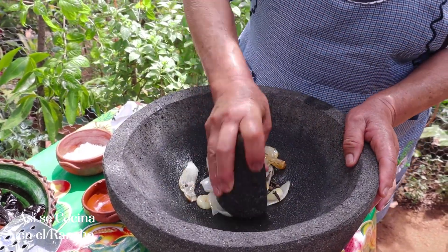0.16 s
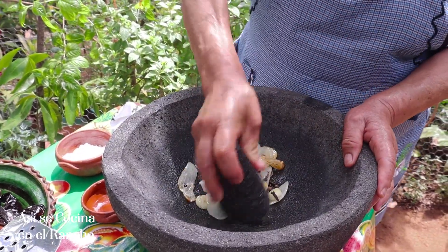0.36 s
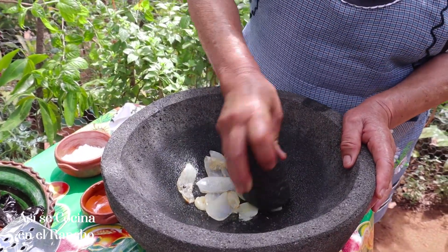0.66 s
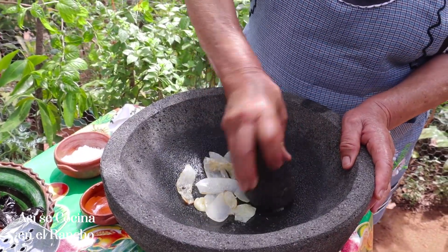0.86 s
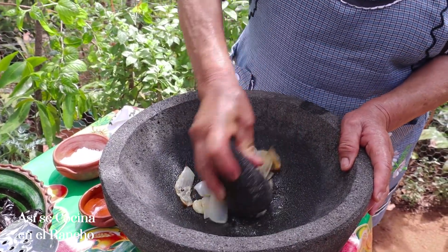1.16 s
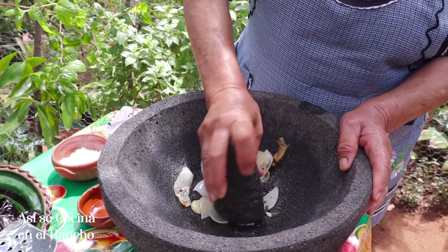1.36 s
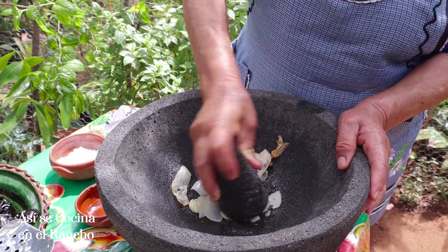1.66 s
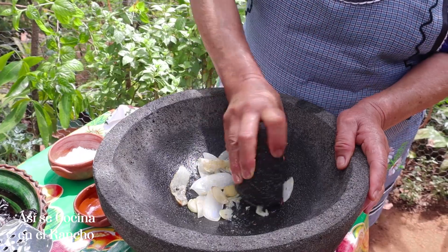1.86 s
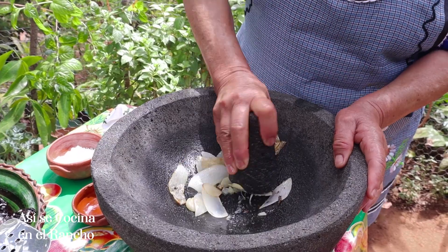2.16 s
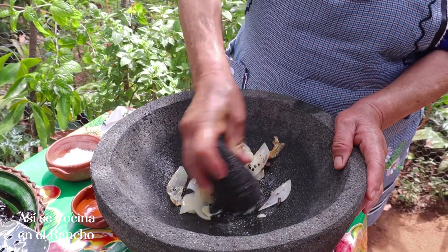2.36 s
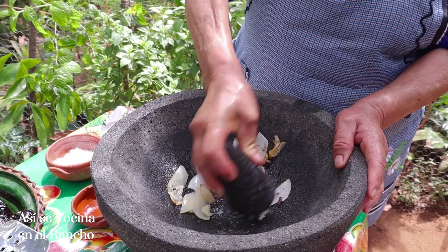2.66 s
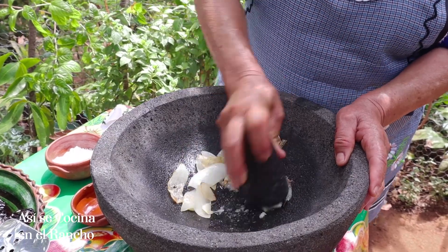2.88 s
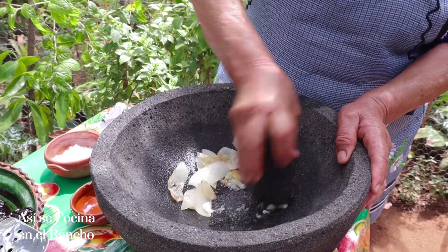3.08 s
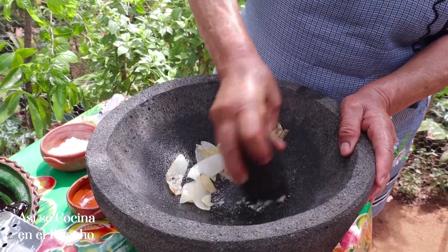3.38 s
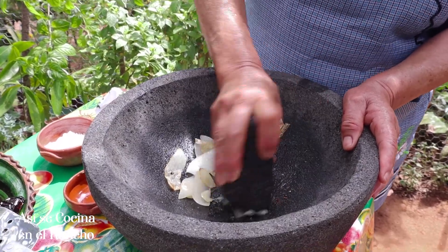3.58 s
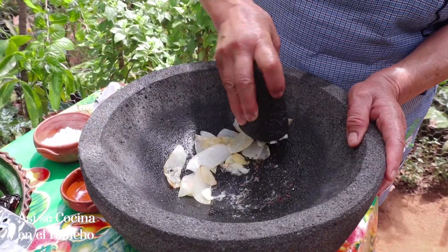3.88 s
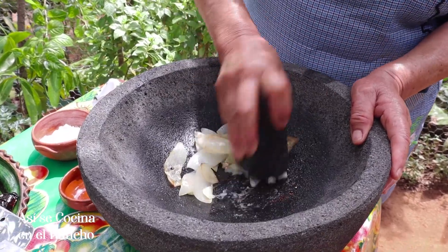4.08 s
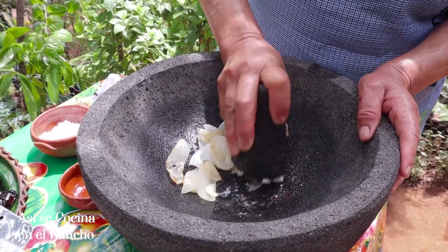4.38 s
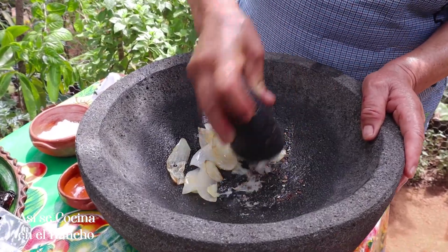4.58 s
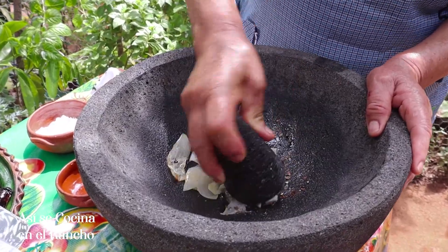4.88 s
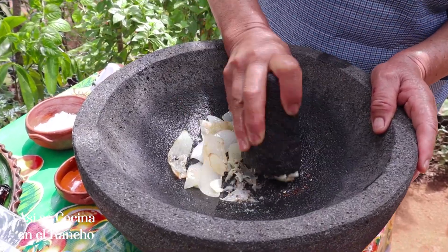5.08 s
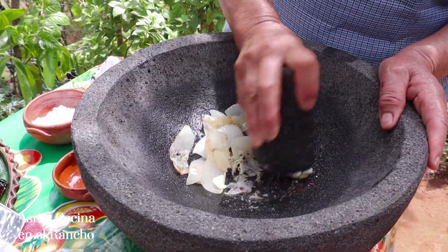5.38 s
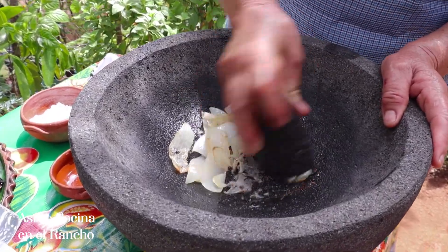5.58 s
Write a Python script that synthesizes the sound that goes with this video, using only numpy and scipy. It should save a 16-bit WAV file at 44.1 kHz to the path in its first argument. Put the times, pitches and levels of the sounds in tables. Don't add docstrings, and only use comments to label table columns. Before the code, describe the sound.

Close, dry outdoor sound of a stone pestle working in a rough stone bowl. Two hard clacks come in the first half second, then short gritty presses with crisp vegetable snaps and dull table thumps. After about three seconds the strokes become longer, grainier grinding sweeps, with a heavy low thud near the end. A very quiet garden and faint far bird whistles lie behind.

```python
import sys
import numpy as np
from scipy import signal
from scipy.fft import rfft, irfft, next_fast_len
from scipy.io import wavfile
from scipy.ndimage import uniform_filter1d

SR = 44100
rng = np.random.default_rng(int(sys.argv[2]) if len(sys.argv) > 2 else 0)


def how_loud(loudness_db):
    steps = np.asarray(loudness_db, float) / 20
    return 10 ** steps


def materialize(psi):
    bounded = np.clip(np.atleast_2d(psi).T, -1, 1)
    quanta = np.round(bounded * 32767).astype(np.int16)
    wavfile.write(sys.argv[1], SR, quanta)


N = 252913

# frequency_hz, density_db
AIR_SPECTRUM = [(12, -38), (20, 1.5), (53, -13), (93, -13), (472, -18.5), (660, -12), (780, -22),
                (849, -13), (1290, -24), (1860, -21), (2600, -25), (16000, -40)]
AIR_DB = -50.5
# start_s, length_s, pitch_hz, level_db
WHISTLES = [(.42, 0.55, 800, -80), (0.559, 0.075, 1960, -56), (0.62, 0.088, 2520, -58),
            (1.558, 0.082, 1960, -55), (2.068, 0.16, 2460, -55), (2.266, 0.074, 2410, -55),
            (2.622, 0.3, 785, -55), (2.623, 0.21, 2070, -63), (4.548, 0.21, 780, -59),
            (0.097, .2, 2050, -62), (2.727, .1, 1990, -64), (3.795, 0.13, 790, -69)]

# centre_hz, width_hz, level_db
TABLE_MODES = [(91.3, 48, -5), (168, 29, -2.5), (241.4, 33, -5), (279.6, 49, 0.5), (384.4, 444, 0)]
# start_s, peak_db, pitch_hz
THUMPS = [(0.065, -11.5, 290), (0.203, -16, 285), (0.363, -5, 338), (1.055, -15.5, 174), (1.121, -6, 277),
          (1.318, -14.5, 238), (1.651, -34, 278), (1.812, -25, 240), (1.887, -24, 132), (1.989, -15.5, 193),
          (2.186, -33, 272), (2.253, -7.5, 255), (2.336, -8, 216), (2.451, -15, 280), (2.51, -12.5, 183),
          (2.57, -11, 158), (2.839, -12, 142), (2.968, -13.5, 178), (3.335, -11.5, 226), (3.643, -18, 304),
          (3.688, -18.5, 200), (3.991, -24.5, 99), (4.114, -10, 138), (4.185, -14, 157), (4.762, 1.5, 193),
          (4.778, -23, 330), (4.805, -27, 286), (4.867, -10, 249), (5.059, -20.5, 280), (5.369, -18, 142),
          (5.425, -14, 250), (5.44, -18, 200), (1.244, -25.5, 200), (2.675, -16.5, 270),
          (4.301, -19.5, 218), (5.536, -15, 246)]

# pitch_hz, t60_s
BOWL_MODES = [(285, .04), (490, .06), (625, .025), (765, .05), (860, .032), (1090, .02), (1185, .055),
              (1525, .024), (1790, .022), (2175, .028), (2410, .024), (3022, .035), (3445, .018),
              (3630, .022)]
STRUCK_SPOTS = [
    (-30, -13, -17, -14, -4, 2, -8, -9, -13, -19, -31, -33, -24, -22),
    (-30, -15, -19, -21, -8, 0, -5, -3, -6, -10, -9, -11, -7, -8),
    (-34, -33, -36, -26, -12, -15, -33, -21, -26, -48, -46, -46, -44, -44),
    (-30, -22, -19, -17, -18, -19, -20, -13, -28, -30, -36, -38, -33, -30),
]
# peak_db, ring_factor, contact_ms
CLACKS = [
    (-1.5, 1, .13),
    (1, 1, .08),
    (-14.5, 0.75, 0.24),
    (-11, 0.64, 0.23),
]
CLACK_TIMES = [.0693, .3673, .8385, 3.5511]
# start_s, peak_db, best_excited_hz, loss_db_per_octave
KNOCKS = [(0.051, -23, 520, -5), (.141, -26.5, 605, 1), (0.206, -20, 554, 31), (1.052, -29, 800, 16),
          (1.121, -28, 1050, 24), (1.192, -27.5, 650, 8), (1.322, -29.5, 790, 28), (1.81, -23.5, 504, -1.5),
          (2.004, -16.5, 696, 52), (2.088, -27.5, 704, 33), (2.256, -20.5, 750, 6), (2.338, -18, 750, -16),
          (2.353, -11.5, 640, 60), (2.399, -27, 550, 24), (2.458, -24, 840, 41), (2.566, -19.5, 773, -5),
          (3.262, -21, 750, 7), (3.289, -25.5, 1180, 39), (3.307, -13.5, 570, 45), (3.608, -18.5, 465, -4),
          (3.642, -16, 614, 27), (4.133, -14, 1570, 13), (4.259, -23.5, 617, 3), (4.768, -6.5, 506, 5),
          (4.838, -31, 1060, 5), (5.425, -22.5, 730, 36), (1.408, -37.5, 1200, 20), (1.634, -41, 1190, 22),
          (1.988, -29, 760, 10), (2.186, -40, 1050, 18), (2.453, -27, 800, 30), (2.499, -43, 640, 23),
          (2.596, -32, 860, 17), (2.62, -31, 765, 17), (2.646, -31.5, 505, 20), (2.66, -37, 860, 14),
          (3.619, -27, 1090, 15), (3.663, -26, 625, 22), (3.695, -33, 765, 22), (3.022, -23, 930, 20),
          (3.164, -30.5, 1170, 11), (3.243, -35, 1180, 25), (3.299, -20.5, 1185, 27),
          (4.168, -23, 1200, 12), (4.327, -32.5, 765, 23), (4.477, -28.5, 490, 19),
          (4.864, -21.5, 1790, 15), (5.061, -29, 626, 25), (5.175, -35, 560, 18), (5.547, -23.5, 630, 13)]
PADDED_RING = 0.45
BUILD_SHARE, BUILD_S = 0.7, 0.0015
RADIATES_ABOVE_HZ = 250

# start_s, peak_db, centre_hz, brightness_db
SNAPS = [(.3667, -18.5, 4900, -27), (.974, -19.5, 5560, -21), (1.0503, -19, 4050, -2),
         (1.0576, -20, 5500, -5), (1.1207, -14.5, 4400, -7), (1.1293, -10.5, 7060, 3),
         (1.1401, -17, 5500, 5), (1.3212, -7, 3770, -4.5), (1.3253, -9.5, 3830, -3), (1.9895, -19, 3150, 4),
         (2.2553, -16, 4050, -1.5), (2.3369, -12, 5950, 3.5), (2.5684, -10, 5000, -3.5),
         (3.2127, -19, 6550, -32), (3.51, -20.5, 4500, -24), (4.0096, -23.5, 3000, -16),
         (4.1175, -14, 4500, -8), (4.1338, -7, 4940, 3), (4.1352, -6, 4760, -24), (4.1391, -11, 5260, -7),
         (4.1577, -13, 4820, 11), (4.7625, -11.5, 4550, -1), (4.7658, -7, 3900, -0.5),
         (4.9121, -16, 3580, -34), (5.1815, -25.5, 9000, 7), (5.2149, -17.5, 4200, -23)]
# start_s, peak_db, centre_hz
TICKS = [(0.0358, -29, 5360), (0.14, -30, 2500), (0.2065, -21.5, 6600), (0.724, -31, 4520),
         (.742, -25.5, 6100), (0.7715, -26.5, 5700), (.98, -24, 5240), (1.299, -23, 6440),
         (1.368, -22.5, 6700), (1.378, -30, 6010), (1.587, -27.5, 4800), (1.6353, -25.5, 5770),
         (1.641, -23.5, 6550), (1.9172, -28, 4600), (1.9406, -27, 5270), (2.208, -23.5, 5340),
         (2.3768, -23.5, 5800), (2.23, -27.5, 4600), (2.5296, -26.5, 4380), (2.711, -21, 4740),
         (2.8413, -22, 4300), (2.946, -21, 7440), (2.952, -20, 6700), (3.012, -29, 3340),
         (4.1919, -16.5, 4160), (4.221, -20, 5700), (4.479, -20.5, 7700)]
TICK_EDGE_DB, EDGE_DB_PER_OCTAVE = -2, 10
SNAP_RISE_S = 0.0003
# start_s, peak_db, centre_hz
CRUMBS = [(0.2712, -22.5, 5740), (0.2885, -31, 3200), (0.9574, -42, 6950), (0.9645, -29, 5760),
          (1.093, -20, 3580), (1.2361, -39, 3700), (1.3005, -20, 4200), (1.34, -25, 3260),
          (1.4277, -26, 4860), (1.4444, -34, 4120), (1.4731, -27, 9210), (1.4898, -27.5, 3820),
          (1.525, -23, 5370), (1.5614, -17, 6790), (1.5677, -17, 5480), (1.581, -18, 5170),
          (1.708, -26, 3060), (1.7494, -31, 3380), (1.8656, -29, 5070), (1.8974, -27, 3610),
          (1.9708, -21, 3440), (2.0226, -25, 2980), (2.522, -18, 4500), (2.9874, -32, 3060),
          (2.9965, -25, 3390), (3.1659, -11, 6600), (3.3646, -6.5, 12600), (3.4317, -28, 5460),
          (3.457, -16, 5580), (3.5476, -16, 6730), (3.5594, -20, 5700), (3.7564, -24, 7190),
          (3.7814, -42, 3100), (4.084, -12, 3660), (4.1706, -8, 5230), (4.3536, -19, 4010),
          (4.4328, -12.5, 3420), (4.502, -8.5, 5000), (4.5859, -16.5, 10600), (5.0525, -23, 3510),
          (5.0997, -12, 3400), (5.1163, -10, 5450), (5.137, -27, 4480), (5.1622, -16, 3400),
          (5.276, -16, 7540), (5.2904, -32, 4570), (5.3198, -37, 3180), (5.396, -11.5, 4050),
          (5.425, -16, 3080), (5.487, -31, 3340), (5.5032, -18, 3630), (5.518, -21, 3940),
          (5.548, -10, 5670), (5.5872, -22.5, 5340), (5.662, -25, 5100), (5.668, -23, 4230),
          (5.7155, -23, 4070)]
CRUMB_CYCLES, CRUMB_DB = 1.3, -2.4
# start_s, length_s,
# level_db, centre_hz
CRUNCHES = [(1.546, 0.025, -36, 5140), (1.806, 0.01, -34.5, 3720), (1.953, 0.057, -40.5, 11800),
            (2.329, .01, -33, 4000), (2.49, 0.023, -36, 4360), (2.576, 0.036, -36, 4440),
            (3.008, 0.0072, -23.5, 3530), (3.005, 0.0084, -26, 7900), (3.02, 0.013, -36, 3330),
            (3.135, 0.006, -37.5, 3700), (3.324, 0.012, -21, 8900), (3.335, 0.0088, -21, 11200),
            (3.455, 0.012, -40, 5500), (3.481, 0.022, -28, 5800), (3.608, 0.037, -28, 4700),
            (3.636, 0.027, -28.5, 10000), (2.075, .025, -44, 11000), (2.631, 0.016, -38, 6460),
            (3.99, 0.013, -34, 11000), (4.029, 0.027, -35.5, 3340), (4.085, 0.032, -34, 11000),
            (4.42, 0.032, -41, 14100), (4.43, 0.044, -37.5, 2380), (4.788, 0.042, -35.5, 11000),
            (4.856, 0.026, -22.5, 2940), (4.912, 0.024, -25, 4000), (5.051, 0.047, -29.5, 3120),
            (5.235, 0.027, -29, 5600), (5.357, 0.025, -35, 9800), (5.491, 0.021, -36, 4000),
            (5.531, 0.017, -28.5, 4840), (5.678, 0.017, -25.5, 4500), (5.693, 0.01, -20, 5000),
            (0.0687, 0.0055, -28, 1780), (0.365, 0.0064, -27, 2850), (0.197, .012, -37, 2200),
            (1.309, 0.0037, -39, 5000), (2.257, 0.0061, -33, 1810), (2.337, .01, -33, 1700),
            (2.572, 0.063, -45, 1500), (2.641, .045, -46.5, 900), (3.597, 0.024, -34, 1100),
            (3.644, 0.04, -27, 620), (4.145, .05, -38, 12500), (4.765, 0.0077, -24.5, 2200),
            (4.468, 0.032, -39, 1900), (4.872, 0.075, -37, 2020), (5.05, 0.048, -46, 2000)]
CRUNCH_WIDTH, TEAR_SPREAD_DB = 0.65, 4
CRACKLE_PER_S, CRACKLE_DB = 130, -55
CRACKLE_FOLLOWS = 0.6

# start_s, length_s, grit_db, weight_db
PRESSES = [(.032, 0.058, -41.5, 1), (.174, 0.061, -40.5, 4), (.243, 0.064, -49.5, -25),
           (.303, 0.077, -44, -37), (.55, 0.064, -48.5, -24), (.649, 0.22, -49.5, -3),
           (.892, 0.076, -48.5, -2), (.962, 0.045, -51.5, 8), (1.025, 0.09, -47, 4),
           (1.104, 0.054, -32, -0.5), (1.187, 0.14, -46, -5.5), (1.31, 0.055, -32, -5.5),
           (1.349, 0.042, -43.5, 5.5), (1.374, 0.084, -45, -0.5), (1.471, 0.15, -47.5, -1.5),
           (1.614, 0.083, -41, 4.5), (1.684, 0.083, -40.5, -1), (1.857, 0.063, -40, -2.5),
           (1.893, 0.19, -48.5, 7.5), (2.039, 0.037, -50, -5), (2.059, 0.062, -50.5, 1),
           (2.138, .11, -43.5, 2), (2.304, .11, -41.5, 4.5), (2.396, .18, -49.5, 3.5),
           (2.501, 0.019, -48, 12.5), (2.566, 0.067, -39.5, 6.5), (2.612, 0.083, -45, 9)]
# start_s, length_s, grit_db, weight_db
SWEEPS = [(2.808, 0.14, -52, 0.5), (2.919, 0.089, -41, -3.5), (2.985, 0.068, -47, 7.5),
          (3.125, 0.092, -43.5, 3.5), (3.206, 0.06, -55.5, 7.5), (3.26, .11, -40.5, 5.5),
          (3.379, 0.049, -55.5, -16), (3.42, .11, -38, -3.5), (3.54, 0.019, -44, -7),
          (3.573, 0.16, -36.5, -0.5), (3.745, 0.034, -50.5, -29), (3.98, 0.063, -33, -17.5),
          (4.05, 0.15, -30.5, -13), (4.11, .15, -35.5, 0.5), (4.302, 0.11, -37.5, -7),
          (4.387, 0.16, -41.5, -4), (4.441, 0.13, -41, -2), (4.584, 0.03, -51, -11),
          (4.739, 0.065, -30, -20), (4.765, 0.11, -36.5, -13), (4.835, 0.1, -26.5, -12),
          (4.91, 0.057, -40, -6), (5.03, 0.093, -29.5, -13.5), (5.1, 0.14, -40, -5.5),
          (5.15, 0.16, -37.5, -2), (5.32, .14, -38, -2), (5.471, 0.045, -36, -1), (5.5, 0.082, -39.5, -0.5),
          (5.636, .1, -39, -2)]
# fizz_db, bowl_db, bowl_share_of_weight, table_db, rise_and_fade_share
PRESS_FEEL = (2.7, -12, 1.62, 1.9, 3)
SWEEP_FEEL = (-1, -4.5, 1.75, 1.2, 1.03)
# time_s, pitch_hz
CONTACT_PATH = [(0.0, 3360), (0.38, 3220), (0.91, 4800), (1.32, 4050), (1.63, 4550), (1.69, 3500),
                (2.97, 4700), (3.08, 3200), (3.19, 6540), (3.97, 3840), (4.15, 5120), (4.41, 4160),
                (4.58, 5800), (4.78, 3630), (4.87, 4300), (5.07, 4000), (5.73, 5130)]
# centre_hz, width_hz, level_db
PESTLE_MODES = [(2000, 170, 5), (2520, 350, 12.5), (3117, 84, 7.5), (3400, 270, 14.5), (4050, 850, 14),
                (5270, 480, 14.5), (5360, 3600, -16), (6750, 1300, -9)]
# frequency_hz, density_db
FIZZ_SPECTRUM = [(3530, 7.5), (6000, 4.5), (6680, -1), (9080, -3.5), (9660, -3), (14300, -5.5),
                 (16000, -13)]
DUST_DB_PER_OCTAVE, MID_CONTACT_HZ = 22.5, 4300
DUST_PATCH_DB = 2.5
PRESS_BED, SWEEP_BED = 0.11, 0.38
RING_SPREAD = 0.6
BIGGEST_GRAIN = 2
SCATTER_DB = -23


def evened(x):
    return x / np.sqrt(np.mean(x ** 2) + 1e-20)


def smoothed(x, first, second):
    return uniform_filter1d(uniform_filter1d(x, size=first), size=second)


def add(mix, start_s, sound):
    part = mix[round(start_s * SR):][:len(sound)]
    part += sound[:len(part)]


def coloured(x, points):
    size = next_fast_len(len(x))
    hz, db = np.transpose(points)
    shape_db = np.interp(np.log(np.fft.rfftfreq(size, 1 / SR) + 1), np.log(hz), db)
    return evened(irfft(rfft(x, size) * how_loud(shape_db), size)[:len(x)])


def resonate(x, hz, width):
    b, a = signal.iirpeak(min(hz, 0.45 * SR), max(hz / width, 0.3), SR)
    return signal.lfilter(b, a, x)


def twice(x, hz, width):
    return resonate(resonate(x, hz, width), hz, width)


def garden():
    drift = evened(smoothed(rng.standard_normal(N), 6000, 6000))
    out = how_loud(AIR_DB + 1.3 * drift) * coloured(rng.standard_normal(N), AIR_SPECTRUM)
    for start_s, length_s, hz, db in WHISTLES:
        noise = rng.standard_normal(SR)[:int(length_s * SR)]
        whistle = evened(twice(noise, hz, 140)) * np.hanning(len(noise))
        add(out, start_s, how_loud(db) * whistle)
    return out


def nearby(x):
    t = np.arange(6000) / SR
    taps = rng.standard_normal(len(t)) * how_loud(-60 * t / 0.12) * (t > 0.0015)
    taps = signal.lfilter([1], [1, -0.6], taps)
    return signal.oaconvolve(x, taps / np.linalg.norm(taps))[:N]


def thumps():
    out, t = np.zeros(N), np.arange(6000) / SR
    hum = sum(how_loud(db) * np.sin(2 * np.pi * hz * t) * np.exp(-t / 0.024) for hz, _, db in TABLE_MODES)
    for start_s, db, hz in THUMPS:
        swing = np.sin(2 * np.pi * hz * t) * np.exp(-t / 0.0063) + 0.063 * hum
        push = 1 - np.exp(-t / 0.0034)
        add(out, start_s + 0.0038, how_loud(db - 4.0) * swing * push)
    return out


def ring(level_db, damping, contact_ms):
    t = np.arange(4000) / SR
    hz, t60 = np.transpose(BOWL_MODES)[:, :, None]
    build = 1 - BUILD_SHARE * np.exp(-t / BUILD_S)
    modes = how_loud(-60 * t / (damping * t60)) * np.sin(2 * np.pi * hz * t) * build
    contact = np.hanning(int(contact_ms * SR / 1000) + 3)
    struck = np.convolve(how_loud(level_db) @ modes, contact)
    b, a = signal.butter(2, RADIATES_ABOVE_HZ, "high", fs=SR)
    struck = signal.lfilter(b, a, struck)
    return struck / abs(struck).max()


def knocks():
    out, mode_hz = np.zeros(N), np.transpose(BOWL_MODES)[0]
    for start_s, (db, damping, contact_ms), spot_db in zip(CLACK_TIMES, CLACKS, STRUCK_SPOTS):
        add(out, start_s, how_loud(db) * ring(spot_db, damping, contact_ms))
    for start_s, db, best_hz, slope_db in KNOCKS:
        level_db = -slope_db * abs(np.log2(mode_hz / best_hz))
        add(out, start_s, how_loud(db) * ring(level_db, PADDED_RING, 250 / best_hz))
    return out


def crumbs():
    out, t = np.zeros(N), (np.arange(120) - 30) / SR
    for (start_s, db, hz), (turn, lag) in zip(CRUMBS, rng.random((len(CRUMBS), 2))):
        envelope = np.exp(-(t * hz / (0.4 * CRUMB_CYCLES)) ** 2)
        pop = np.cos(2 * np.pi * (hz * t + turn)) * envelope
        echo = 0.33 * np.roll(pop, 15 + int(35 * lag))
        add(out, start_s, how_loud(db + CRUMB_DB) * (pop + echo))
    return out


def crunches():
    out = np.zeros(N)
    noise = rng.standard_normal((len(CRUNCHES), 2, 3000))
    for (start_s, length_s, db, hz), (grain, size) in zip(CRUNCHES, noise):
        torn = twice(grain * how_loud(TEAR_SPREAD_DB * size), hz, CRUNCH_WIDTH * hz)
        rush = evened(torn)[:int(length_s * SR)]
        add(out, start_s, how_loud(db) * rush * np.hanning(len(rush)) ** 0.53)
    return out


def snaps():
    out, t = np.zeros(N), np.arange(500) / SR
    breaks = SNAPS + [(s, db, hz, TICK_EDGE_DB + EDGE_DB_PER_OCTAVE * np.log2(hz / 5000))
                      for s, db, hz in TICKS]
    noise = rng.standard_normal((len(breaks), 2, 500))
    sizes = how_loud(4.0 * np.minimum(rng.exponential(1, noise.shape), 2))
    splinters = sizes * (rng.random(noise.shape) < 0.12) / 5
    splinters[len(SNAPS):] *= 0.15
    rise = np.minimum(t / SNAP_RISE_S, 1)
    for (start_s, db, hz, bright_db), grain, bits in zip(breaks, noise, splinters):
        burst = grain * rise * (np.exp(-t / 0.0011) + 0.95 * bits * np.exp(-t / 0.0086))
        body = twice(burst[0], hz, 0.55 * hz)
        edge = twice(burst[1], 9840, 12600)
        both = body / np.linalg.norm(body) + how_loud(bright_db) * edge / np.linalg.norm(edge)
        add(out, start_s, how_loud(db + 5.0) * both / abs(both).max())
    return out + 2.0 * resonate(out, 2950, 59)


def pressures():
    out = np.zeros((4, N))
    for strokes, feel in ((PRESSES, PRESS_FEEL), (SWEEPS, SWEEP_FEEL)):
        fizz_db, bowl_db, share, table_db, edge = feel
        for start_s, length_s, db, weight_db in strokes:
            swell = signal.windows.tukey(max(int(length_s * SR), 50), min(edge, 1)) ** 1.11
            layers_db = [0, fizz_db, bowl_db + share * weight_db, table_db + weight_db]
            for layer, extra_db in zip(out, layers_db):
                add(layer, start_s, how_loud(db + extra_db) * swell)
    return out


def crackle():
    busy = uniform_filter1d(pressures()[0], size=1500) + how_loud(-72)
    fresh = np.where(np.arange(N) < SWEEPS[0][0] * SR, 1, 0.45)
    out = np.zeros(N)
    for hz in (4500, 6500, 9000, 12500):
        size = how_loud(4.5 * np.minimum(rng.exponential(1, N), 3))
        clicks = size * (rng.random(N) < CRACKLE_PER_S / 4 / SR)
        out += evened(twice(clicks, hz, 0.8 * hz))
    return how_loud(CRACKLE_DB) * evened(out * fresh * busy ** CRACKLE_FOLLOWS)


def grit(per_s, spread_db, bed, clump_db):
    size = how_loud(spread_db * np.minimum(rng.exponential(1, N), BIGGEST_GRAIN)) * rng.choice([-1., 1.], N)
    grains = evened(size * (rng.random(N) < per_s / SR))
    clumps = np.clip(evened(smoothed(rng.standard_normal(N), 160, 420)), -BIGGEST_GRAIN, BIGGEST_GRAIN)
    return evened((grains + bed * rng.standard_normal(N)) * how_loud(clump_db * clumps))


def pestle_scrape(contact_hz):
    bed = np.where(np.arange(N) < SWEEPS[0][0] * SR, PRESS_BED, SWEEP_BED)
    out, power = np.zeros(N), np.zeros(N)
    for hz, width, db in PESTLE_MODES:
        weight = how_loud(db - 8.1 * abs(np.log2(hz / contact_hz)))
        out += weight * evened(twice(grit(1200, 10.5, bed, 2.2), hz, 2.86 * width))
        power += weight ** 2
    return out / np.sqrt(power)


def dust_fizz(contact_hz):
    ticks = [twice(grit(400, 4.2, 0.7, 4.5), hz, 0.5 * hz) for hz in (7500, 10500, 14500)]
    patches = evened(smoothed(rng.standard_normal((3, N)), 900, 900))
    dust = sum(map(evened, ticks * how_loud(DUST_PATCH_DB * patches)))
    fizz = coloured(dust + 0.5 * grit(200, 3.0, 0.1, 2.5), FIZZ_SPECTRUM)
    return fizz * how_loud(DUST_DB_PER_OCTAVE * np.log2(contact_hz / MID_CONTACT_HZ))


def bowl_scrape():
    rough = grit(500, 2.4, 0.35, 3.2)
    modes = list(zip(BOWL_MODES, STRUCK_SPOTS[0]))[1:11]
    return sum(how_loud(RING_SPREAD * db) * evened(resonate(rough, hz, 5.7 / t60)) for (hz, t60), db in modes)


def table_rumble():
    lumps = grit(200, 1.8, 0.36, 0.92)
    return sum(how_loud(db) * evened(twice(lumps, hz, 1.6 * width)) for hz, width, db in TABLE_MODES)


def scraping():
    contact_hz = np.interp(np.arange(N) / SR, *np.transpose(CONTACT_PATH))
    layers = (pestle_scrape(contact_hz), dust_fizz(contact_hz), bowl_scrape(), table_rumble())
    pressure = pressures()
    keep = np.exp(-1 / (0.041 * SR))
    pressure = pressure + 0.25 * signal.lfilter([1 - keep], [1, -keep], pressure)
    return sum(p * evened(layer) for p, layer in zip(pressure, layers))


def scene():
    bowl = thumps() + knocks() + crumbs() + crunches() + snaps() + crackle() + scraping()
    return (garden() + how_loud(SCATTER_DB) * nearby(bowl) + bowl)[None]


def top_cut(x):
    return signal.sosfilt(signal.butter(12, 16480, fs=SR, output="sos"), x)


def record(dry):
    power_db = 10 * np.log10(abs(uniform_filter1d(dry[0] ** 2, size=200)) + 1e-12)
    fall = np.arange(N) * 900.0 / SR
    over_db = np.maximum(np.maximum.accumulate(power_db + fall) - fall + 32.5, 0)
    late_db = np.pad(uniform_filter1d(over_db, size=300), (400, 0))[:N]
    band = signal.firwin(255, 15900, window=("kaiser", 5), fs=SR)
    limited = signal.oaconvolve(dry / how_loud(0.31 * late_db), band[None], "same")
    return top_cut(np.clip(limited, -1, 1))


dry = scene()
out = record(dry)
materialize(out)
```